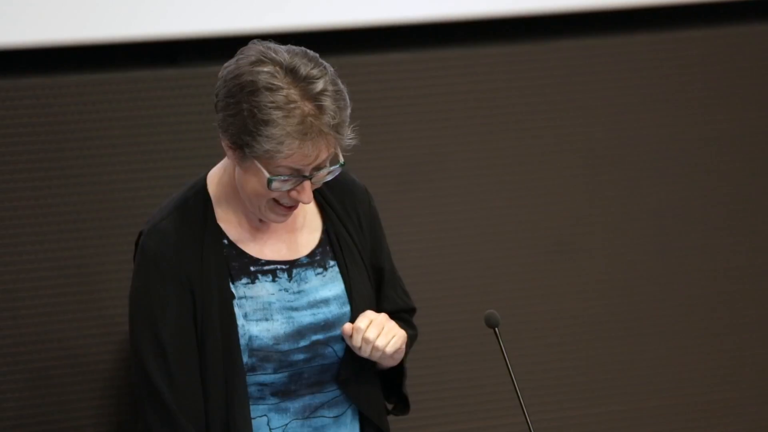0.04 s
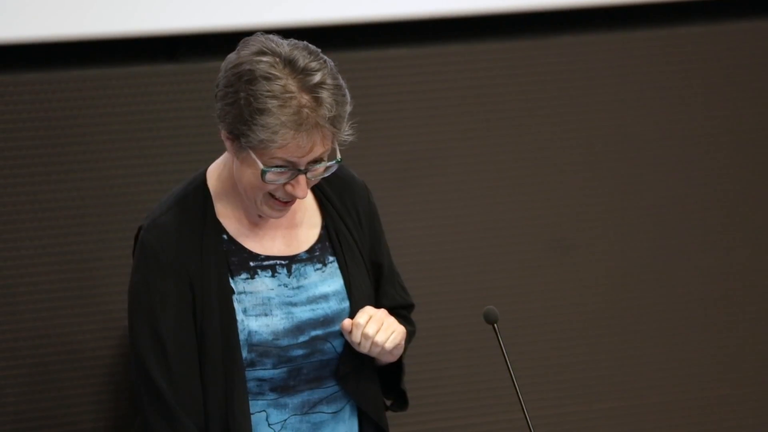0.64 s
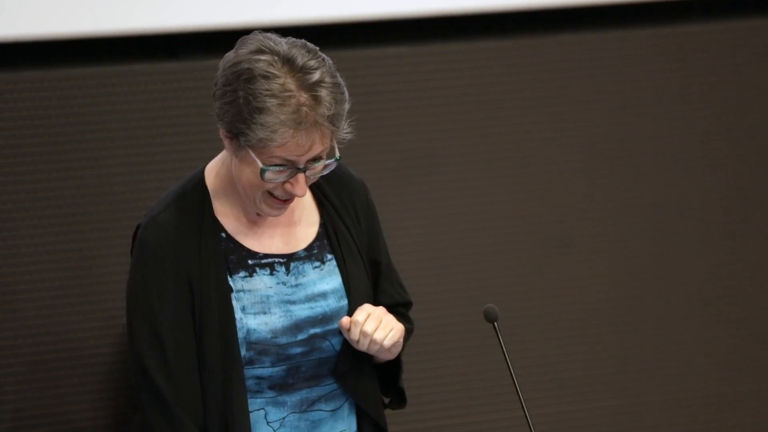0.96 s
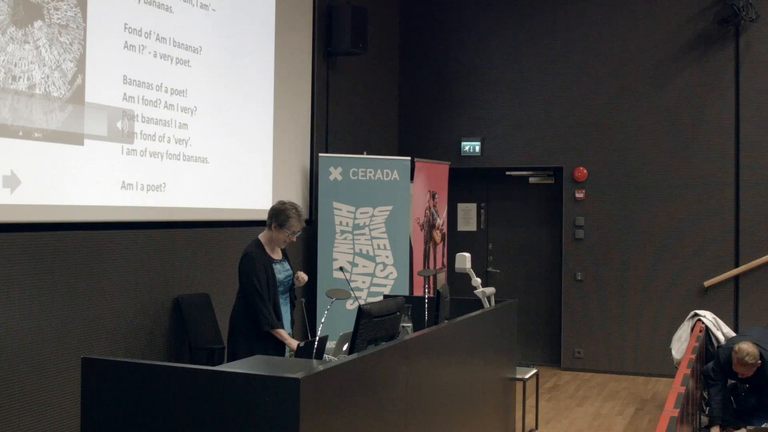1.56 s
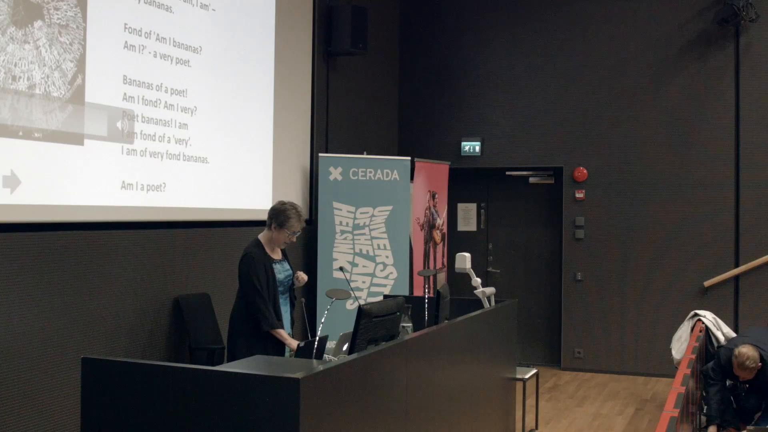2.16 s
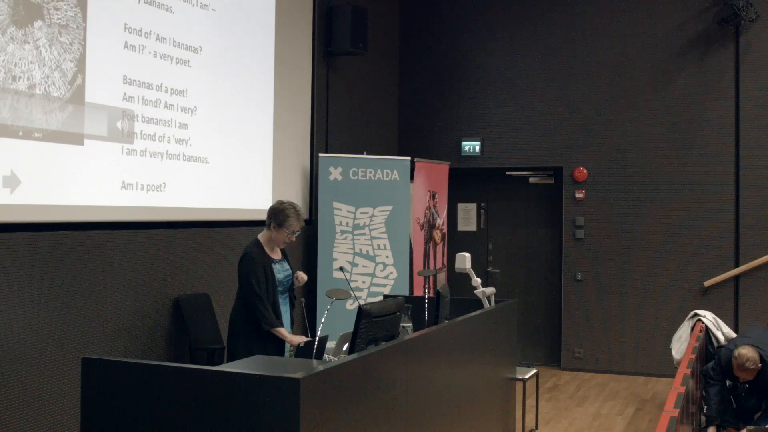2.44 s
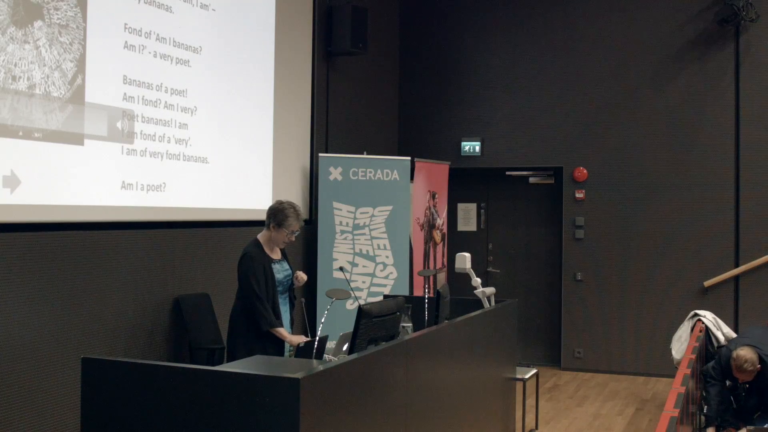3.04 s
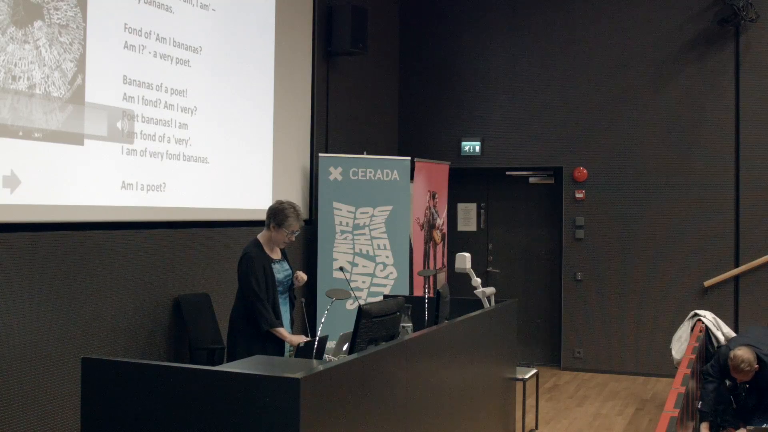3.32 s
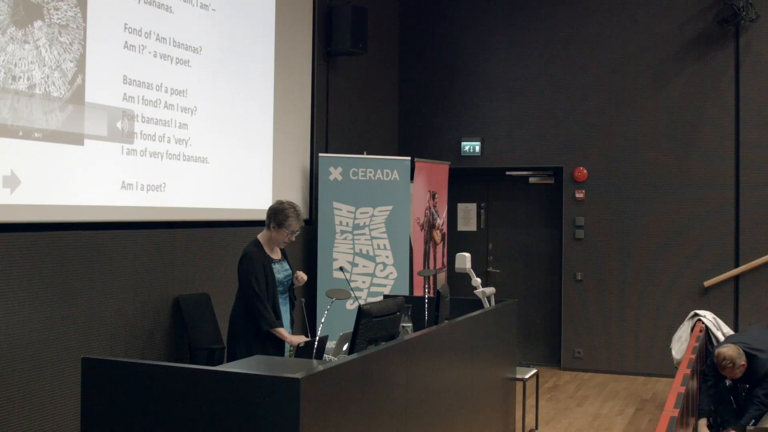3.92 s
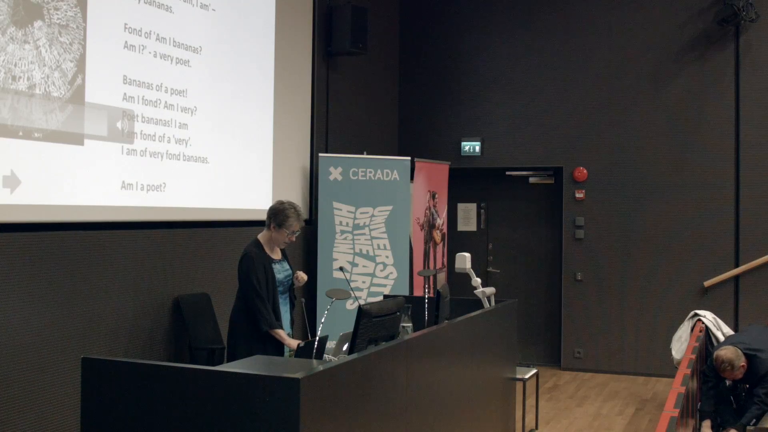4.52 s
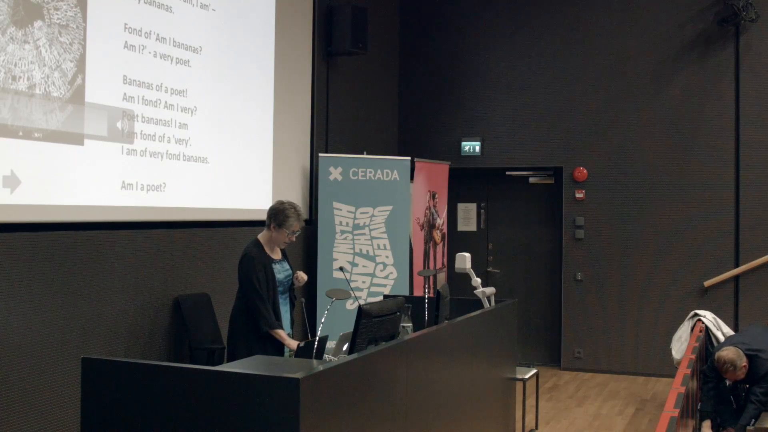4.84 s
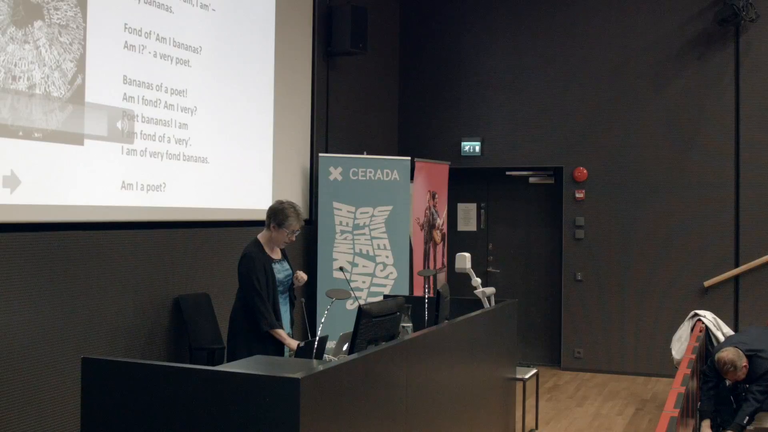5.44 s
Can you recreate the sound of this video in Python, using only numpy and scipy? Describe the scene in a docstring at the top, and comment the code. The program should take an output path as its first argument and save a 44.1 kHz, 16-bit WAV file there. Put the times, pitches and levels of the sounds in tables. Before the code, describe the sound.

One loud plastic clack from a laptop, then faint taps, clicks and a brief key clatter over low room hum.

```python
"""A laptop on a lectern gives one hard double clack: two plastic rattles that set the case ringing.
Faint finger taps and button clicks come and go; keys clatter briefly near the end. Each is a decaying
noise burst shaped by the shell's resonances. Sleeves rustle. The lecture hall adds two early echoes
and a short tail, over mains hum, ventilation and microphone hiss."""
import sys
import numpy as np
from scipy import signal
from scipy.fft import rfft, irfft
from scipy.io import wavfile
from scipy.ndimage import uniform_filter1d

SR = 44100
rng = np.random.default_rng(int(sys.argv[2]) if len(sys.argv) > 2 else 0)


def wrap_up_sound(samples):
    """Save the sound to the file named by the first command line argument, as 16-bit audio."""
    columns = np.atleast_2d(samples).T
    # keep every value between -1 and 1, then stretch to whole-number steps
    tamed = np.clip(columns, -1, 1)
    steps = np.round(tamed * 32767).astype(np.int16)
    wavfile.write(sys.argv[1], SR, steps)


N = 246122
BLOW_N = 8192
BINS_HZ = np.fft.rfftfreq(BLOW_N, 1 / SR)

# blows of the clack: start_s, level_db, thud_db, tilt_db_per_oct, decay_s
CLACK_BLOWS = [(0.7494, 12.5, -13.5, -1.2, 0.021), (0.7626, 12, -5.5, -1.5, 0.0024)]
# clack spectrum: freq_hz, gain_db
CLACK_COLOUR = [(30, -20), (85, 4), (200, 1.5), (350, 6.5), (750, -10), (1300, 4.5), (1700, -4.5),
                (3200, 3.5), (4900, -0.5), (5800, 2.5), (7200, -2.5), (8300, -1), (10000, -6),
                (15500, -4.5)]
# case modes: pitch_hz, level_db, t60_s
CASE_MODES = [(98, -41, .5), (352, -27, .11), (1132, -34, .17), (1235, -31, .12), (1331, -29, .24),
              (1562, -34, .17), (1820, -39, .22), (2239, -40, .24), (2823, -28, .19), (2917, -28, .37),
              (2923, -23, .1), (3040, -29, .11), (3670, -24.5, .19), (3725, -37, .2), (4078, -24, .1),
              (4221, -36, .22), (4565, -47, .45), (5120, -34, .15), (5497, -30, .26), (5686, -22, .1),
              (5949, -25, .1), (6348, -26, .11), (7380, -47, .24), (8072, -32, .17), (8880, -29, .07),
              (12200, -46, .2), (13690, -30, .07)]
# spectrum of a stroke on the shell: freq_hz, gain_db
SHELL_COLOUR = [(30, -14), (80, -9), (150, -2), (350, -1.5), (900, -4.5), (1600, -1.5), (2100, -2.5),
                (3700, 4), (4800, -4), (8500, -4.5), (12000, -15.5), (15500, -9)]
# soft finger taps: start_s, level_db, ring_hz, decay_s
FINGER_TAPS = [(0.1018, -27.5, 1380, 0.0019), (.207, -16, 1850, 0.011), (.472, -17, 3400, 0.017),
               (0.5269, -19.5, 2000, 0.018), (1.313, -22, 261, 0.015), (1.381, -16.5, 1560, 0.0059),
               (1.457, -23, 850, 0.01), (1.515, -23, 1340, .008), (1.6445, -20, 1790, 0.0021),
               (1.867, -22.5, 2150, 0.0042), (2.353, -21.5, 2220, 0.0025), (2.547, -23, 3580, 0.0056),
               (2.918, -29.5, 1180, 0.0014), (2.981, -25, 2400, 0.0025), (3.207, -21, 850, 0.0095),
               (3.303, -20, 795, 0.0076), (3.433, -26, 750, 0.0046), (3.902, -29, 400, 0.005),
               (3.979, -22.5, 650, 0.0052), (4.523, -18.5, 3280, 0.0079), (5.258, -24.5, 524, 0.0061),
               (5.372, -26.5, 1140, 0.0024)]
# button clicks, with the bright snap of the key stroke at 4.552 s as the last row: start_s, level_db,
# tilt_db_per_oct, main_hz, main_db, second_hz
BUTTON_CLICKS = [(.4302, -21, -3.5, 9000, 19, 5750), (1.828, -24, 0, 3710, 15, 8600),
                 (2.1093, -30.5, 1, 2950, 13, 5600), (2.475, -22, -1.5, 5640, 11, 4120),
                 (2.738, -24, -2, 6360, 14, 9000), (3.385, -21, 4, 4350, 6, 7460),
                 (3.6515, -20.5, -4.5, 2930, 18, 5700), (4.5515, -10.5, -1.5, 13600, 19, 3350)]
# firm key strokes: start_s, level_db, thud_db, tilt_db_per_oct, ring_hz, ring_db, decay_s
KEY_STROKES = [(.7055, -13, -2, -4, 2460, 6, 0.0031), (.721, -11.5, -2, -1.5, 3520, 13.5, 0.00083),
               (4.0078, -20, 10.5, -3, 4260, 8, 0.0032), (4.552, -7, -8.5, -7.5, 1390, 4, 0.0037),
               (4.608, -7.5, -4.5, -7, 2320, 15, 0.002), (4.6528, -11, 1.5, -7.5, 560, 11, 0.0032),
               (4.7963, -14.5, -16, -4.5, 4050, 14, 0.0018), (4.8067, -13, -3, -6.5, 357, 11, 0.0059),
               (4.824, -13, -1, -5.5, 4080, 17, 0.0019), (5.562, -14, -22, -1.8, 3400, 4, 0.0035)]
# hollow keyboard deck resonances: freq_hz, gain_db
DECK_MODES = [(350, 12), (580, 2), (1220, 0), (1520, 4.5), (1720, 8), (3450, -0.5)]
# hall reverberation: freq_hz, t60_s
HALL_DECAY = [(80, 0.88), (300, 0.33), (1300, 0.35), (3000, .35), (6000, 0.3), (12000, 0.31), (16000, 0.18)]
# mains hum and equipment whines: pitch_hz, rms_db, wander_hz
HUM_TONES = [(49.7, -57.5, 0.22), (103, -67, 1.04), (151.1, -60.5, 0.63), (1280, -73, 3.7),
             (1365, -86, 0.72), (3050, -101, 9.7), (3570, -79.5, 5.4), (6350, -86, 42), (6820, -80, 50),
             (7418, -92, 21)]
# ventilation and microphone hiss spectrum: freq_hz, relative_db
AIR_COLOUR = [(20, -13), (40, 0), (65, -2), (92, 3), (125, 0), (180, -1.5), (280, -7.5), (370, -7),
              (480, -11.5), (950, -16.5), (1280, -14), (2100, -24), (3600, -21), (4800, -27), (9000, -28.5),
              (15500, -29.5)]


def clack(swell_s=0.0025):
    """Two hard blows in quick succession crack and set the case modes ringing."""
    out, t = np.zeros(N), np.arange(SR // 2) / SR
    for start_s, level_db, thud_db, tilt, decay_s in CLACK_BLOWS:
        colour_db = level_db + log_interp(CLACK_COLOUR, BINS_HZ) + contact_db(thud_db, tilt)
        add(out, start_s, blow(colour_db, decay_s))
    swell = 1 - np.exp(-t / swell_s)
    for hz, level_db, t60_s in CASE_MODES:
        start_s = CLACK_BLOWS[int(hz < 1400)][0]  # the second, heavier blow wakes the low modes
        add(out, start_s, amp(level_db - 60 * t / t60_s) * swell * np.sin(2 * np.pi * hz * t))
    return out


def blow(colour_db, decay_s, rise_s=1e-4):
    """Dying rattle of plastic parts, flattened and coloured by a minimum-phase filter."""
    t = np.arange(BLOW_N) / SR
    envelope = np.exp(-t / decay_s) * (1 - np.exp(-t / rise_s))
    rattle = rfft(rng.standard_normal(BLOW_N) * envelope)
    magnitude = np.sqrt(uniform_filter1d(abs(rattle) ** 2, size=61))
    log_gain = np.log(amp(colour_db) / magnitude)
    mirrored = np.concatenate([log_gain, log_gain[-2:0:-1]])
    response = np.exp(np.conj(signal.hilbert(mirrored)))[:len(BINS_HZ)]
    return irfft(rattle * response)


def contact_db(thud_db, tilt_db_per_oct, desk_hz=550, knee_hz=1200):
    """A heavy contact shakes the desk; a hard one lifts the treble."""
    desk = 1 / (1 + (BINS_HZ / desk_hz) ** 4)
    octaves = np.log2(np.maximum(BINS_HZ / knee_hz, 1))
    return thud_db * desk + tilt_db_per_oct * (octaves - 1)


def resonance_db(hz, peak_db, base_width_hz=65, damping=0.015, lossy_hz=9000):
    """One spectral peak; plastic damps high resonances most, so they are wide."""
    half_width_hz = base_width_hz + damping * hz * (1 + (hz / lossy_hz) ** 2) ** 2
    return peak_db / (1 + ((BINS_HZ - hz) / half_width_hz) ** 2)


def key_strokes():
    """Firm strokes excite the hollow deck and one resonance each."""
    deck_db = sum(resonance_db(hz, db, base_width_hz=16, damping=0.055) for hz, db in DECK_MODES)
    for start_s, level_db, thud_db, tilt, ring_hz, ring_db, decay_s in KEY_STROKES:
        colour_db = level_db + deck_db + contact_db(thud_db, tilt)
        yield start_s, colour_db, resonance_db(ring_hz, ring_db), decay_s


def finger_taps(mute_s=0.0074, overtone_ratio=1.59):
    """Dull taps: each spot rings with one overtone; lower spots shake the desk more."""
    for start_s, level_db, ring_hz, decay_s in FINGER_TAPS:
        thud_db = -1 - 4.5 * np.log2(ring_hz / 1200)
        free = 1 / (1 + decay_s / mute_s)  # a lingering finger mutes the resonances
        colour_db = level_db + contact_db(thud_db, tilt_db_per_oct=-7) + resonance_db(ring_hz, free * 16)
        yield start_s, colour_db, resonance_db(ring_hz * overtone_ratio, free * 11.5), decay_s


def button_clicks(thud_db=-2, second_db=9, decay_s=0.0027):
    """Short, sharp contacts with two resonances each."""
    for start_s, level_db, tilt, main_hz, main_db, second_hz in BUTTON_CLICKS:
        ring_db = resonance_db(main_hz, main_db, base_width_hz=35, damping=0.016)
        colour_db = level_db + contact_db(thud_db, tilt) + ring_db
        yield start_s, colour_db, resonance_db(second_hz, second_db), decay_s


def shell_strokes(rise_ratio=0.62, ripple_db=2.0, spread=0.6):
    """The shell radiates taps, clicks and keys: directional modes to the microphone, less all round."""
    ahead, around = np.zeros(N), np.zeros(N)
    shell_db = log_interp(SHELL_COLOUR, BINS_HZ)
    for start_s, colour_db, ring_db, decay_s in [*finger_taps(), *button_clicks(), *key_strokes()]:
        # each spot wakes a different mix of crowded high modes
        modes = uniform_filter1d(rng.standard_normal(len(BINS_HZ)), size=50)
        modes = unit_rms(uniform_filter1d(modes, size=40))
        beam_db = ring_db + ripple_db * modes * np.minimum(BINS_HZ / 5000, 1)
        rise_s = rise_ratio * decay_s
        add(ahead, start_s, blow(shell_db + colour_db + beam_db, decay_s, rise_s))
        add(around, start_s, blow(shell_db + colour_db + spread * beam_db, decay_s, rise_s))
    return ahead, around


def sleeves(level_db=-73, grains_per_s=500, clump_db=5, band_hz=(500, 3800), motion_s=0.074, rest=0.77):
    """Sleeves brush the desk in clumps of tiny grains, a little louder around each finger tap."""
    grains = rng.standard_normal(N) * (rng.random(N) < grains_per_s / SR)
    grains *= amp(clump_db * drift(rate_hz=12.3))
    band = signal.butter(2, band_hz, "band", fs=SR)
    rustle = unit_rms(signal.lfilter(*band, grains))
    t = np.arange(N) / SR
    near_tap = np.max([np.exp(-((t - tap[0]) / motion_s) ** 2) for tap in FINGER_TAPS], axis=0)
    return amp(level_db) * rustle * (rest + (1 - rest) * near_tap)


def hall(x, echo_db, tail_db, cutoff_hz, build_s, echo_s=0.0131):
    """A wall echo, its repeat and a diffuse tail; the walls absorb treble."""
    hz, t, spectra = signal.stft(rng.standard_normal(SR), SR, nperseg=256)
    decay = amp(-60 * t / log_interp(HALL_DECAY, hz)[:, None])
    tail = signal.istft(spectra * decay, SR, nperseg=256)[1]
    tail *= 1 - np.exp(-np.arange(len(tail)) / SR / build_s)
    response = amp(tail_db) * tail / np.linalg.norm(tail)
    add(response, echo_s, amp([echo_db]))
    add(response, 2 * echo_s, amp([echo_db + 0.5]))
    walls = signal.butter(1, cutoff_hz, fs=SR)
    return signal.fftconvolve(x, signal.lfilter(*walls, response))[:N]


def hum():
    """Mains hum and thin equipment whines, each wavering in pitch."""
    out = np.zeros(N)
    for hz, rms_db, wander_hz in HUM_TONES:
        cycles = np.cumsum(hz + wander_hz * drift(rate_hz=2 + 2 * wander_hz)) / SR
        out += amp(rms_db) * np.sqrt(2) * np.sin(2 * np.pi * cycles)
    return out


def air(level_db=-55.0, swell_db=0.88):
    """Ventilation rumble with microphone hiss above it; the level drifts slightly."""
    colour = amp(log_interp(AIR_COLOUR, np.fft.rfftfreq(N, 1 / SR)))
    noise = irfft(rfft(rng.standard_normal(N)) * colour, N)
    return unit_rms(noise) * amp(level_db - swell_db * drift(rate_hz=1.4))


def drift(rate_hz):
    """Random wander of rms 1, low-passed at rate_hz."""
    hz = np.fft.rfftfreq(N, 1 / SR)
    return unit_rms(irfft(rfft(rng.standard_normal(N)) / (1 + (hz / rate_hz) ** 4), N))


def amp(db):
    """Decibels to gain."""
    return 10 ** (np.asarray(db) / 20)


def unit_rms(x):
    """Scales to rms 1."""
    return x / np.sqrt(np.mean(x ** 2) + 1e-20)


def log_interp(table, hz):
    """Reads a table on a log-frequency axis."""
    table_hz, values = np.transpose(table)
    return np.interp(np.log(hz + 1), np.log(table_hz + 1), values)


def add(mix, start_s, sound):
    """Mixes a sound in at start_s."""
    part = mix[round(start_s * SR):][:len(sound)]
    part += sound[:len(part)]


def scene():
    """The laptop in the hall over the steady background; mono."""
    hit = clack()
    loud = hit + hall(hit, echo_db=-16.5, tail_db=-8.0, cutoff_hz=11100, build_s=0.006)
    ahead, around = shell_strokes()
    rustle = sleeves()
    soft_hall = hall(around + rustle, echo_db=-6.0, tail_db=-1.5, cutoff_hz=5960, build_s=0.0014)
    return (loud + ahead + rustle + soft_hall + air() + hum())[None]


def record(dry):
    """Steep low-pass at 15.9 kHz."""
    lowpass = signal.firwin(511, 15900, window=("kaiser", 9), fs=SR)
    return signal.oaconvolve(dry, lowpass[None], "same")


dry = scene()
out = record(dry)
wrap_up_sound(out)
```